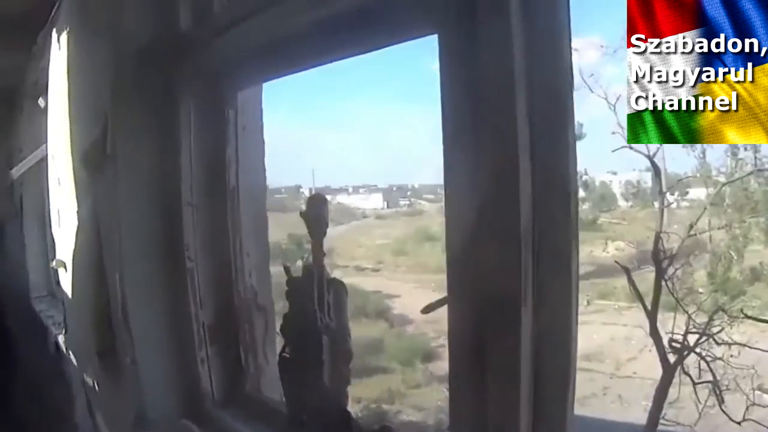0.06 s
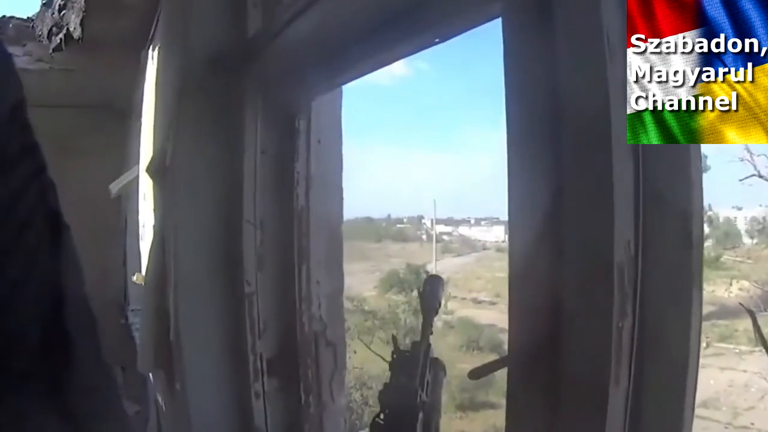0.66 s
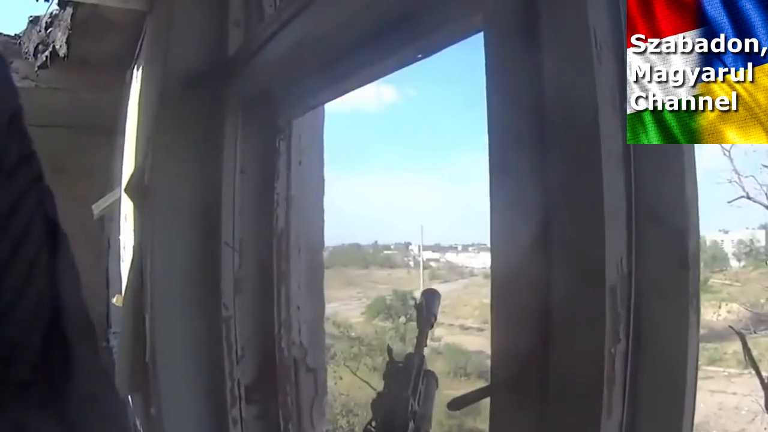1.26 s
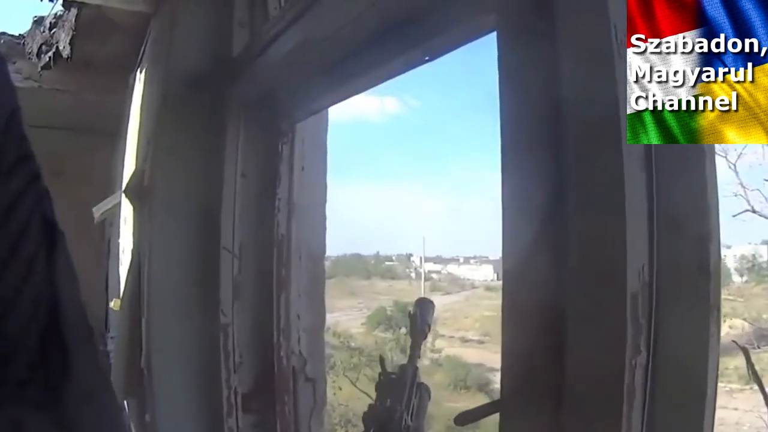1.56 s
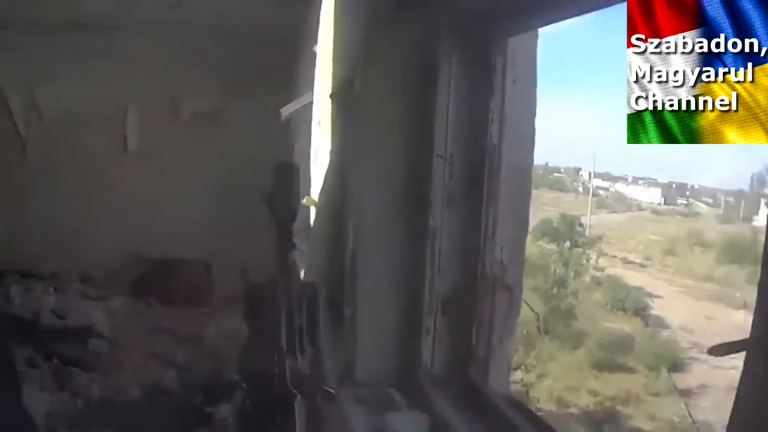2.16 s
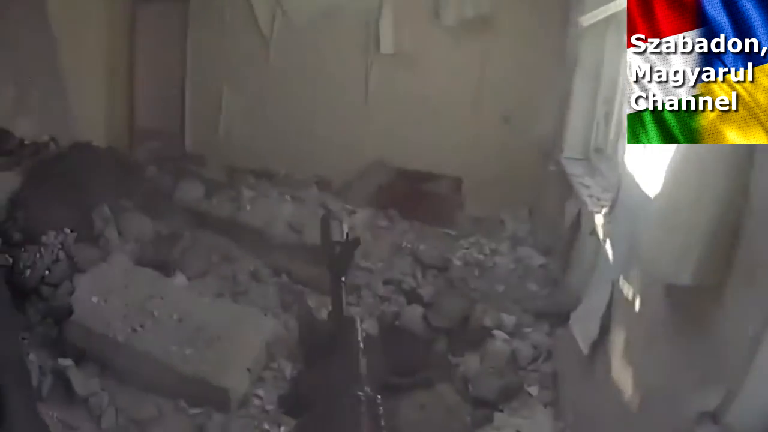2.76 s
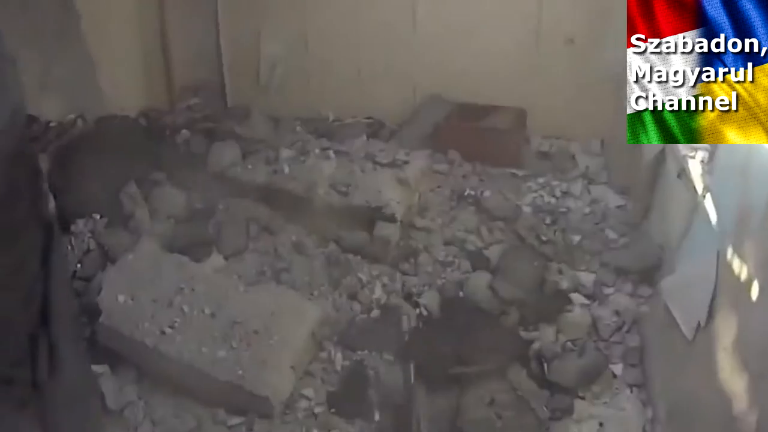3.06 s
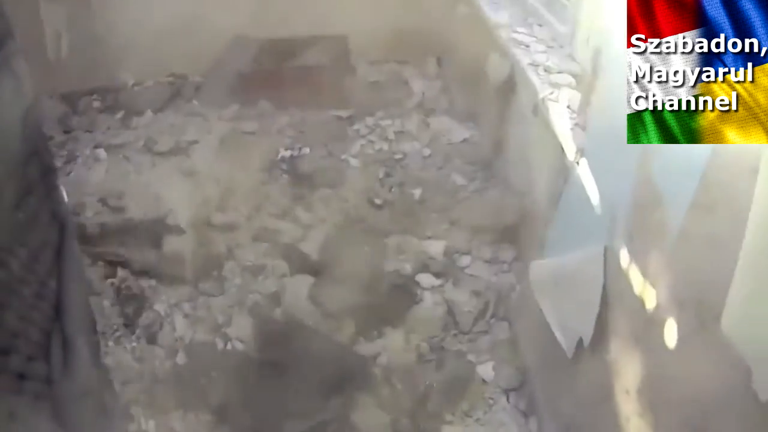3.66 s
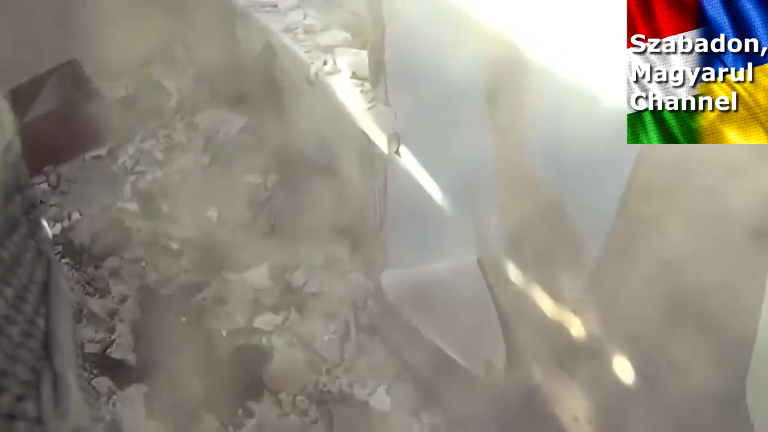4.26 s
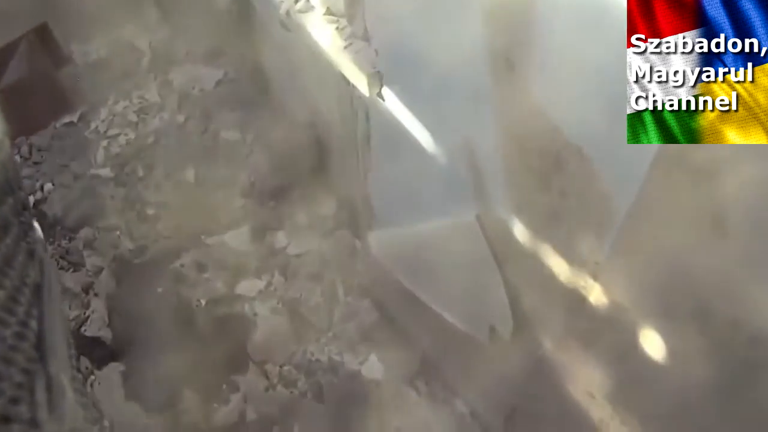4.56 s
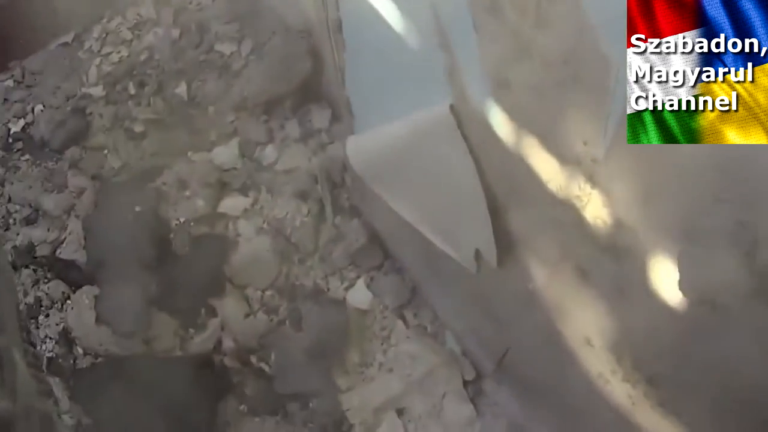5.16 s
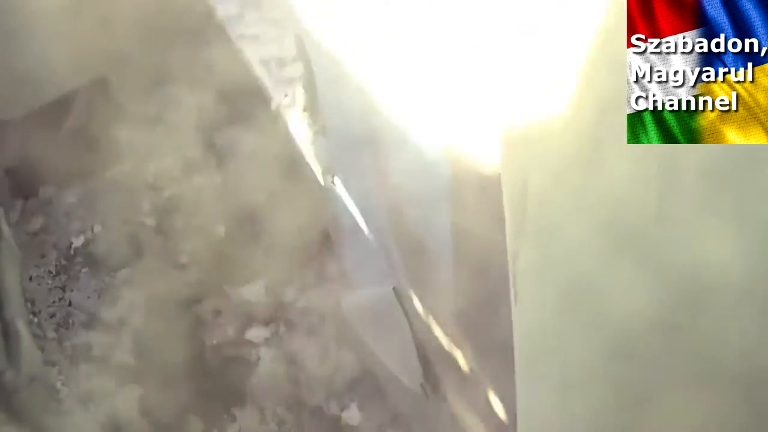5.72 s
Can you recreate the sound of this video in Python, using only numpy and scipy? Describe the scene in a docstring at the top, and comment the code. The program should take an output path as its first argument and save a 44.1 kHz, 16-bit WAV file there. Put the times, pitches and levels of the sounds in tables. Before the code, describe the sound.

Scattered gunfire snaps and rolls away outside while someone shuffles over broken masonry, gear knocking, before a loud shot and a far boom.

```python
"""Firefight from a wrecked room

Heard from a body camera: shots crack and thud, their echoes roll over the open ground outside,
and a distant blast booms low near the end. The wearer turns from the window on a rubble floor:
cloth and grit scrape, gear and masonry knock, and the camera's case honks near 1.5 kHz."""
import sys
import numpy as np
from scipy import signal
from scipy.fft import rfft, irfft
from scipy.io import wavfile
from scipy.ndimage import uniform_filter1d

SR = 44100
rng = np.random.default_rng(int(sys.argv[2]) if len(sys.argv) > 2 else 0)


def materialize(psi):
    """Save the field psi as 16-bit PCM at rate SR to the path in sys.argv[1].

    A 1-D psi becomes a single channel; in a 2-D psi each row is a channel.
    """
    bounded = np.clip(np.atleast_2d(psi).T, -1, 1)
    quanta = np.round(bounded * 32767).astype(np.int16)
    wavfile.write(sys.argv[1], SR, quanta)


N = 255339
TIME = np.arange(N) / SR
BAND_LIMIT_HZ = 11080

# Cue lists; levels are relative within each layer.
# gunfire rolling over open ground: t/s, level/dB, t60/s
ROLLS = [(-0.03, -41.5, 0.9), (1.585, -42.5, 0.45), (1.666, -46, 1.9), (2.657, -41, 4), (3.824, -45, 1.4),
         (5.126, -37.5, 15), (5.25, -31, 0.84)]
# hollow hums of the case: start/s, end/s, level/dB
HUMS = [(0.877, 1.282, -55.5), (2.0, 2.197, -54), (3.02, 3.275, -51), (4.843, 5.175, -54)]
# feet on rubble: t/s, press/s, crunch/dB, settling t60/s; then, against the crunch,
# case/dB, dull body/dB, air push/dB
STEPS = [(0.3, 0.019, -36.5, 0.88, -1.5, -17, -24), (0.333, 0.015, -36, 0.47, 4.5, -1, -9),
         (2.746, 0.029, -30.5, 0.49, 1, -12, -22), (3.237, 0.017, -39.5, 0.67, 1, -1, -16),
         (3.275, 0.068, -33.5, 0.44, 4, -6, -3.5), (3.336, 0.01, -29.5, 0.15, 7.5, -27, -5.5),
         (3.806, 0.02, -31.5, 0.49, 5.5, -17.5, -4), (3.913, 0.031, -34.5, 0.3, 4, -6.5, -28)]
# cloth and gear rubbing: middle/s, length/s, level/dB, case against that level/dB
RUBS = [(1.942, 0.1, -47.5, 2.5), (2.09, 0.34, -52, 3), (2.275, 0.33, -52, -3), (2.287, 0.082, -48.5, -2),
        (2.572, 0.21, -52.5, 0), (2.977, 0.087, -64, -8), (3.615, 0.097, -58, -5),
        (4.142, 0.11, -47.5, -12), (4.212, 0.1, -50.5, 1), (4.474, 0.13, -61.5, 6)]
# the body bumping the camera mount: t/s, level/dB
BUMPS = [(0.239, -45.5), (0.452, -38), (0.805, -43.5), (1.091, -38.5), (1.175, -40), (1.628, -41.5),
         (1.787, -42), (1.84, -41), (1.876, -45), (1.911, -42.5), (2.042, -37), (2.159, -42.5),
         (2.356, -38.5), (2.597, -40), (2.838, -34.5), (2.91, -36.5), (3.182, -36.5), (3.552, -38),
         (3.758, -43.5), (3.976, -40.5), (4.123, -41.5), (4.588, -40.5), (4.716, -45.5), (4.846, -40.5),
         (5.745, -38.5)]
# loose masonry underfoot: t/s, level/dB
KNOCKS = [(0.455, -47), (0.55, -49.5), (1.09, -56), (1.171, -52.5), (2.246, -47.5), (3.35, -31.5),
          (3.537, -49), (4.121, -42.5), (4.129, -49)]
# passing bullets and clicks of hard gear: t/s, level/dB, tilt/(dB per octave), room send/dB
CRACKS = [(0.0165, -38, -2, -13.5), (1.1749, -34.5, -2, -24), (1.3466, -29, 0, -46), (1.5842, -6, 3.5, -20),
          (1.9629, -9.5, 6.5, -34), (2.9827, -27, 6, -21), (3.027, -23, -2.5, -20.5), (3.044, -26, 2, -43),
          (3.2233, -20.5, 2, -23), (4.1873, -28.5, -2, -8.5), (4.386, -55.5, -1.5, 5.5),
          (4.6973, -34.5, -2.5, -13), (4.869, -17.5, 3.5, -27), (4.8819, -21, 0.5, -18.5),
          (5.249, -13.5, -1.5, -23), (5.776, -32.5, 2, -30)]
# shots, their strongest wall slaps, and two faint rustles of debris (at 3.767 and 4.548 s):
# t/s, level/dB; then, against that level, bright edge/dB, thud/dB, room send/dB;
# then room t60/s, room tilt/(dB per octave)
SHOTS_AND_DEBRIS = [(0.041, -20.5, -19, -14, -19.5, 0.59, 0), (0.746, -40.5, -44.5, -22, -4.5, 0.22, -3),
                    (0.866, -41, -10, -7, -5, 0.24, -6.5), (1.666, -22.5, -15, -7.5, 1.5, 0.11, 1.5),
                    (1.697, -23, -21, -30, 2, 0.16, 0.5), (1.736, -27.5, -46, -11, -1.5, 0.57, -2),
                    (2.657, -27, 2, -5, 0, 0.34, 2), (2.682, -25, -5, -36, -7, 0.31, 2.5),
                    (3.767, -35, 0, -12, -5, 0.38, 4.5), (3.824, -22, 3, -23, -7, 0.58, -5.5),
                    (4.548, -45.5, 3, -17, -1, 0.63, 8), (5.1255, -10.5, -1.5, -15.5, -14, 0.4, -5.5),
                    (5.1339, -10, -41, -29, -12.5, 0.5, -3.5), (5.162, -14.5, -32, -36, -13.5, 1, -1.5),
                    (5.658, -28.5, -8, -16, -6, 0.63, -3.5)]

# Tone curves, all as f/Hz, level/dB.
AMBIENCE_EQ = [(12, -22), (28, 0), (55, -11.5), (120, -2.5), (160, -18.5), (198, -3.5), (290, -17.5),
               (600, -19.5), (850, -18.5), (1050, -20), (1500, -11.5), (2500, -21), (5200, -21),
               (7500, -22), (11000, -27)]  # rumble under thin hiss
BOOM_EQ = [(20, -24), (60, -9.5), (110, -2), (160, -2), (230, -10.5), (310, -17.5), (450, -25.5),
           (1500, -80)]  # bass of the far blast
ROLL_EQ = [(200, -22), (600, -21), (1000, -16), (1280, -6), (1480, -2.5), (1720, -5.5), (2050, -7.5),
           (3200, -17.5), (4300, -22.5), (5050, -23.5), (6000, -25.5), (11000, -34)]  # nasal wash of far echoes
HUM_EQ = [(900, -39), (1300, -11), (1480, -1.5), (1660, -8), (1900, -10), (3000, -31)]  # main resonance of the case
GRIT_EQ = [(400, -29), (1300, 4.5), (2300, 1), (3300, -1.5), (4100, -2.5), (5000, -2), (6200, -4),
           (7800, -10), (9300, -13.5), (11000, -15.5)]  # bright crunch
HONK_EQ = [(500, -34), (1000, -18), (1270, 1), (1530, 4.5), (1750, 1), (2150, -8), (4000, -66)]  # the case under pressure
BODY_EQ = [(40, -28), (120, 1.5), (260, 7), (400, -0.5), (650, -2), (880, 4), (1200, 2), (2500, -48),
           (7000, -75)]  # dull body of a scrape
PUSH_EQ = [(8, -20), (20, -7), (34, -1.5), (60, -7), (110, -17), (250, -32), (800, -45)]  # sub-bass of air at the microphone ports
PAT_EQ = [(50, -29), (130, -3), (260, 0.5), (340, -3), (480, -28), (1200, -73)]  # soft pat on the mount
KNOCK_EQ = [(100, -9), (280, 3.5), (480, 3), (650, -4), (900, 5), (1200, -9), (2500, -30), (7000, -70)]  # dull masonry
CRACK_EQ = [(200, -31), (800, -22), (1400, 3.5), (2100, -7), (3700, -1), (5000, 1.5), (6000, -0.5),
            (7000, -0.5), (7800, 3.5), (8600, -6), (9400, -3), (10100, -7), (11000, -5.5)]  # treble snap
MUZZLE_EQ = [(60, -40), (200, -17), (400, -19), (650, -15), (1000, -17), (1300, 4), (1720, 1.5), (2050, -9),
             (3000, -18.5), (4300, -54), (5300, -23), (11000, -47)]  # muzzle blast honking the case
THUD_EQ = [(60, -36), (200, 15), (420, -12), (800, 15), (1200, 1), (3000, -64), (7000, -82)]  # weight of a shot
ROOM_EQ = [(200, -33.5), (450, -19), (680, -21), (860, -8.5), (1100, -11), (1330, 2.5), (1720, -1),
           (2150, -7.5), (2800, -13), (3700, -15.5), (5200, -19.5), (11000, -36.5)]  # midrange answer of the room

# low modes of the mount: f/Hz, level/dB, t60/s
MOUNT_MODES = [(83.4, -23.5, 0.73), (124.3, -8.5, 0.38), (158, -10, 0.034), (203.6, -1.5, 0.18),
               (231, -10, 0.052), (280, -22, 0.017)]
# narrow resonances of the case, common to every sound: f/Hz, width/Hz, boost/dB
CASE_MODES = [(893, 67, 3), (1237, 5.8, 6), (1500, 14, 4.5), (1606, 31, 4), (1754, 26, 5.5), (2590, 14, 6),
              (2930, 10, 3.5), (3514, 43, 4.5), (3950, 15, 5.5), (4720, 16.4, 9), (5060, 280, 3.5)]
# stereo width of the mix, narrowing to nearly mono in the treble: f/Hz, side gain/dB
STEREO_WIDTH = [(60, -22), (190, -19), (340, 2), (610, 3), (1100, -10), (1960, -8), (3500, -4.5),
                (6300, -14), (11000, -32.5)]
# stereo balance of the mix: f/Hz, left minus right/dB
STEREO_BALANCE = [(60, -3.5), (120, -0.5), (220, -3.5), (430, 0), (820, -3.5), (1580, -0.5), (3030, -2.5),
                  (5830, -1.5), (11200, 1.5)]


def amp(db):
    """Decibels to gain."""
    return 10 ** (np.asarray(db) / 20)


def unit(x):
    """Scales to rms 1."""
    return x / np.sqrt(np.mean(x ** 2) + 1e-20)


def curve_at(points, hz):
    """Reads a curve on a log-frequency axis."""
    f, value = np.transpose(points)
    return np.interp(np.log(hz + 1), np.log(f), value)


def add(mix, s, sound):
    """Mixes a sound in at s seconds."""
    part = mix[:, max(round(s * SR), 0):][:, :sound.shape[1]]
    part += sound[:, :part.shape[1]]


def eq(x, points, tilt_db=0, size=4096):
    """Minimum-phase filter of unit energy, so that the curve's peaks ring after a hit."""
    hz = abs(np.fft.fftfreq(size, 1 / SR))
    octaves = np.log2(np.clip(hz, points[0][0], BAND_LIMIT_HZ))
    log_gain = np.log(amp(curve_at(points, hz) + tilt_db * octaves))
    response = np.exp(np.conj(signal.hilbert(log_gain)))
    taps = np.fft.ifft(response).real[:size // 2]
    return signal.oaconvolve(x, taps[None] / np.linalg.norm(taps), axes=1)[:, :x.shape[1]]


def surge(start, rise, t60):
    """Envelope that ramps to 1, then dies away."""
    t = TIME - start
    return np.clip(t / rise, 0, 1) * amp(-60 * np.maximum(t - rise, 0) / t60)


def arch(middle, length):
    """Envelope that swells to 1 and sinks again."""
    return np.cos(np.pi * np.clip((TIME - middle) / length, -.5, .5))


def hiss(size):
    """Independent white noise for mid and side."""
    return rng.standard_normal((2, size))


def grains(size, per_s, spread_db):
    """Random clicks of uneven strength for mid and side, rms 1."""
    strength = amp(spread_db * np.minimum(rng.exponential(1, size), 4))
    return unit(hiss(size) * strength * (rng.random(size) < per_s / SR))


def hit(direct_db, scatter_db, scatter_t60, size=4096):
    """One centred impulse and its quick scatter off near surfaces."""
    t = np.arange(size) / SR
    out = grains(size, per_s=9000, spread_db=-2.5) * amp(scatter_db - 60 * t / scatter_t60)
    out[0, 0] += amp(direct_db)
    return out


def ambience():
    """A steady bed of microphone hiss and faint rumble from the surroundings."""
    return amp(-57.5) * eq(hiss(N), AMBIENCE_EQ)


def distant_boom(start_s=5.255, rise_s=0.018):
    """A distant blast swells quickly and leaves a long low rumble."""
    blast = amp(-35.5) * surge(start_s, rise_s, t60=0.4)
    rumble = amp(-42) * surge(start_s, rise_s, t60=2.6)
    return eq(hiss(N), BOOM_EQ) * np.hypot(blast, rumble)


def rolling_echoes(gather_s=0.043):
    """Countless far echoes of gunfire gather and fade as an uneven wash, heard through the case."""
    envelope = np.sqrt(sum((amp(db) * surge(s, gather_s, t60)) ** 2 for s, db, t60 in ROLLS))
    wander = uniform_filter1d(uniform_filter1d(rng.standard_normal(N), size=600), size=400)
    lumps = amp(1.04 * unit(wander))  # single echoes stand out
    return amp(-4.5) * eq(hiss(N) * lumps * envelope, ROLL_EQ)


def room_tail(t60, size=32768):
    """Dense reflections of the room build in a few milliseconds and die away."""
    t = np.arange(size) / SR
    attack = 1 - np.exp(-t / 0.0013)
    return grains(size, per_s=8000, spread_db=0.4) * attack * amp(-60 * t / t60)


def case_hums():
    """Far echoes stir only the strongest resonance of the case."""
    envelope = sum(amp(db) * arch((start + end) / 2, end - start) for start, end, db in HUMS)
    return eq(hiss(N) * envelope, HUM_EQ)


def pebbles(per_s=1500, spread_db=3, t60=0.028, count=36, size=4096):
    """Small stones clash; each rings very briefly at a pitch of its own."""
    out, t = np.zeros((2, N)), np.arange(size) / SR
    shape = (2, round(per_s * N / SR / count))
    for hz in np.linspace(2000, 10500, count) * rng.uniform(.96, 1.04, count):
        at = rng.integers(0, N, shape)
        strength = amp(spread_db * np.minimum(rng.exponential(1, shape), 3))
        clashes = np.zeros((2, N))
        np.put_along_axis(clashes, at, strength, axis=1)
        ring = amp(-60 * t / t60) * np.sin(2 * np.pi * hz * t)
        out += signal.oaconvolve(clashes, ring[None], axes=1)[:, :N]
    return unit(out)


def scrapes(push_lag_s=0.01, push_t60=0.29, rub_body_db=-10):
    """Cloth and grit slip in dense tiny catches; pressure rings the case and pushes air at the ports."""
    power = np.zeros((4, N))  # rows: grit, case, body, push
    for start, press, db, t60, case_db, body_db, push_db in STEPS:
        slide = amp(db) * surge(start, press, t60)
        weight = amp(db + push_db) * surge(start + push_lag_s, press, push_t60)  # lands after the crunch
        power[:3] += (slide * amp([[0], [case_db], [body_db]])) ** 2
        power[3] += weight ** 2
    for middle, length, db, case_db in RUBS:
        rub = amp(db) * arch(middle, length)
        power[:3] += (rub * amp([[0], [case_db], [rub_body_db]])) ** 2
    grit, case, body, push = np.sqrt(power)
    slips = unit(grains(N, per_s=5000, spread_db=0.5) + amp(-5) * pebbles())
    crunch = amp(0.5) * eq(slips * grit, GRIT_EQ)
    honk = amp(-2.5) * eq(grains(N, per_s=7000, spread_db=0.4) * case, HONK_EQ)
    rumble = amp(-1.5) * eq(hiss(N) * body, BODY_EQ)
    air = amp(2) * eq(hiss(N) * push, PUSH_EQ)
    return crunch + honk + rumble + air


def mount_bumps(jostle_count=16, jostle_db=-49, size=16384):
    """Each soft knock rings the low modes of the mount; where it lands shifts their pitch and balance."""
    out, t = np.zeros((2, N)), np.arange(size) / SR
    hz, mode_db, t60 = np.transpose(MOUNT_MODES)[:, :, None]
    attack = 1 - np.exp(-t / 0.003)
    # light jostles at uneven moments fill in between the firmer bumps
    jostle_times = (np.arange(jostle_count) + rng.random(jostle_count)) / jostle_count * TIME[-1]
    for s, db in BUMPS + [(s, jostle_db) for s in jostle_times]:
        detune, emphasis = rng.standard_normal((2, 2, len(MOUNT_MODES), 1))
        decay = amp(mode_db + 2.66 * emphasis - 60 * t / t60)
        modes = decay * np.sin(2 * np.pi * hz * (1 + 0.061 * detune) * t)
        pat = eq(hit(direct_db=6, scatter_db=-13, scatter_t60=0.19, size=size), PAT_EQ)
        add(out, s, amp(db) * (modes.sum(1) * attack + amp(-0.5) * pat))
    return amp(-1) * out


def masonry_knocks():
    """Lumps of masonry tip and land without ringing."""
    out = np.zeros((2, N))
    for s, db in KNOCKS:
        add(out, s, amp(db) * eq(hit(direct_db=12, scatter_db=-3.5, scatter_t60=0.043), KNOCK_EQ))
    return amp(5) * out


def cracks(side_db=7):
    """Bullets and hard gear snap brightly; loud ones rattle longer, and the walls add a sizzling tail."""
    out = np.zeros((2, N))
    for s, db, tilt_db, room_db in CRACKS:
        shock = hit(direct_db=6.5, scatter_db=-7, scatter_t60=0.063 * amp(0.31 * db))
        add(out, s, amp(db) * eq(shock, CRACK_EQ, tilt_db))
        add(out, s, amp(db + room_db) * eq(room_tail(t60=0.31), CRACK_EQ, tilt_db))
    return amp(-3) * out * amp([[0], [side_db]])


def shots_and_debris():
    """Each shot, slap or rustle honks the case, with an edge and a thud; the room answers in the mids."""
    out = np.zeros((2, N))
    for s, db, edge_db, thud_db, room_db, room_t60, tilt_db in SHOTS_AND_DEBRIS:
        honk = eq(hit(direct_db=16.5, scatter_db=-3.5, scatter_t60=0.031), MUZZLE_EQ)
        edge = eq(hit(direct_db=19, scatter_db=-1, scatter_t60=0.017), GRIT_EQ, tilt_db=-2.5)
        thud = eq(hit(direct_db=12.5, scatter_db=-2, scatter_t60=0.054), THUD_EQ)
        add(out, s, amp(db) * (honk + amp(edge_db) * edge + amp(thud_db) * thud))
        add(out, s, amp(db + room_db) * eq(room_tail(room_t60), ROOM_EQ, tilt_db))
    return amp(-7) * out


def scene():
    """All layers, mixed as mid and side, ring the case and spread to left and right."""
    background = ambience() + distant_boom() + rolling_echoes()
    foley = case_hums() + scrapes() + mount_bumps() + masonry_knocks()
    mix = amp(-1.05) * (background + foley + cracks() + shots_and_debris())
    hz = np.fft.rfftfreq(2 * N, 1 / SR)
    case_ring = 1 + sum((amp(db) - 1) / (1 + 2j * (hz - f) / width) for f, width, db in CASE_MODES)
    mid, side = rfft(mix, 2 * N) * case_ring
    side *= amp(curve_at(STEREO_WIDTH, hz))
    lean = amp(curve_at(STEREO_BALANCE, hz) / 2)
    left, right = (mid + side) * lean, (mid - side) / lean
    return irfft(np.array([left, right]), 2 * N)[:, :N]


def record(dry):
    """The camera's band limit cuts off the top end steeply."""
    taps = signal.firwin(601, BAND_LIMIT_HZ, window=("kaiser", 8), fs=SR)
    return signal.oaconvolve(dry, taps[None], "same", axes=1)


dry = scene()
out = record(dry)
materialize(out)
```